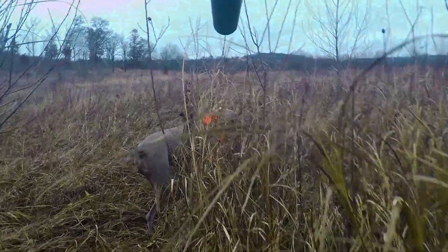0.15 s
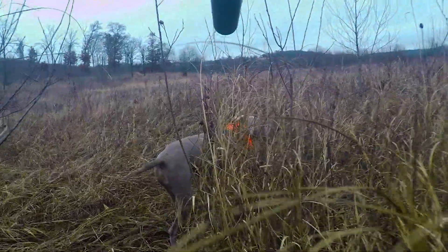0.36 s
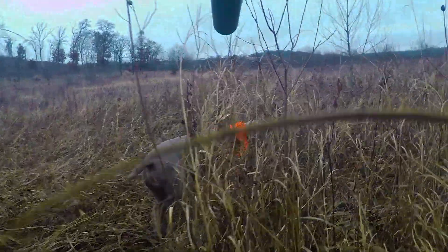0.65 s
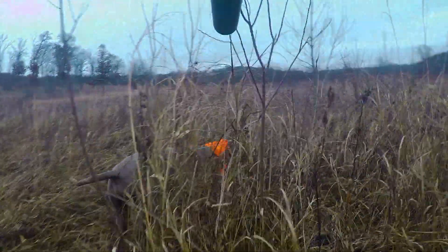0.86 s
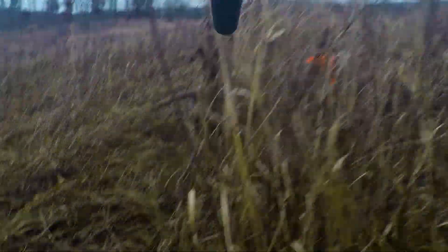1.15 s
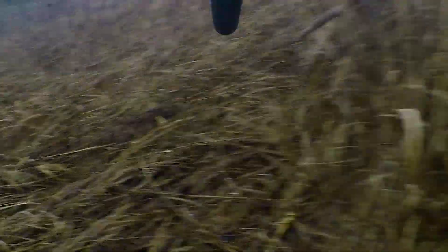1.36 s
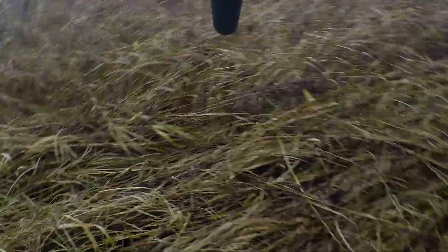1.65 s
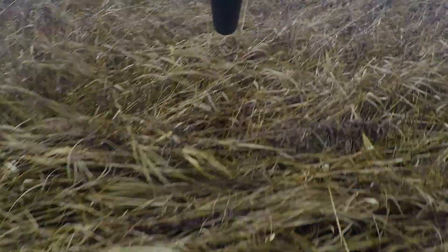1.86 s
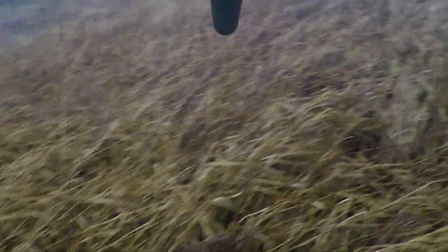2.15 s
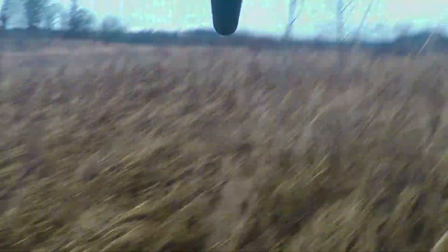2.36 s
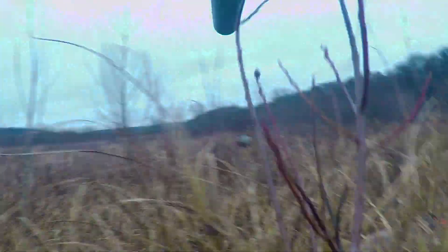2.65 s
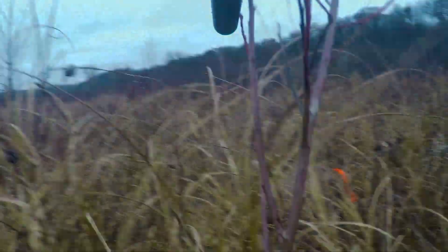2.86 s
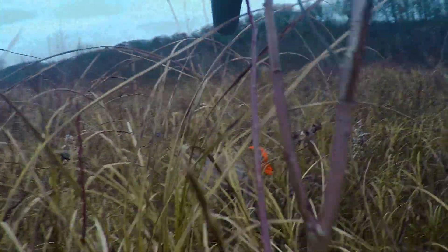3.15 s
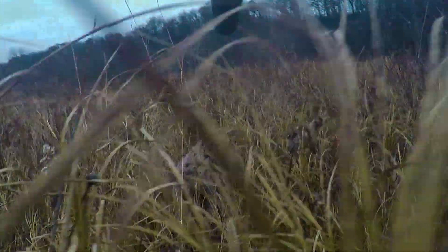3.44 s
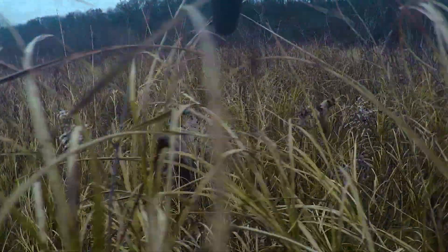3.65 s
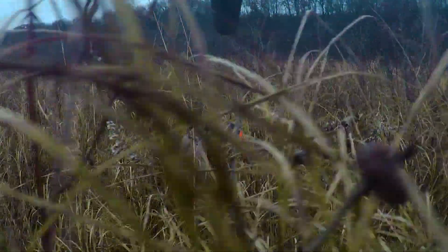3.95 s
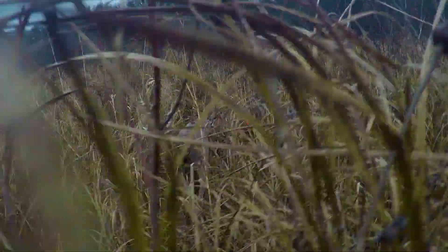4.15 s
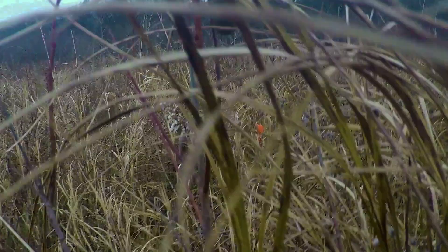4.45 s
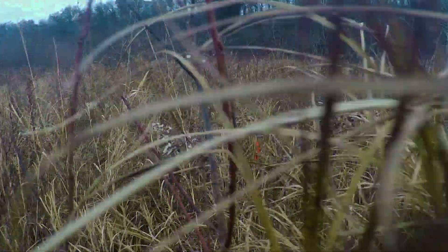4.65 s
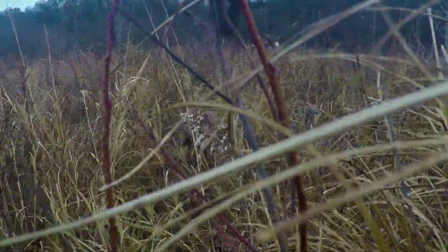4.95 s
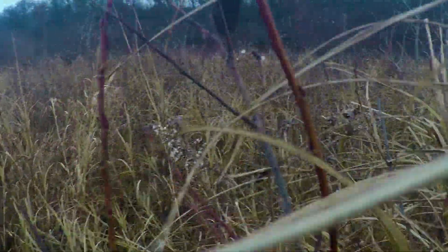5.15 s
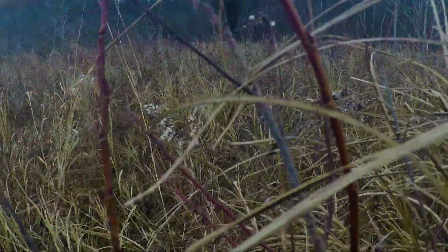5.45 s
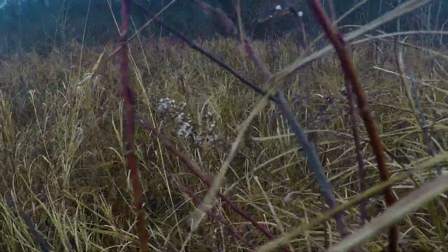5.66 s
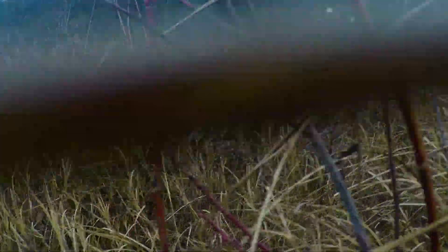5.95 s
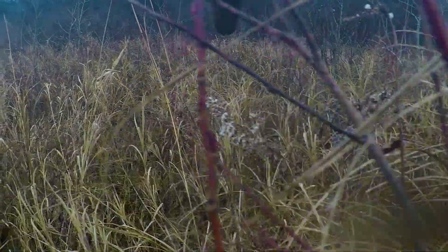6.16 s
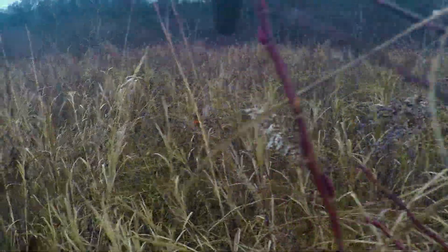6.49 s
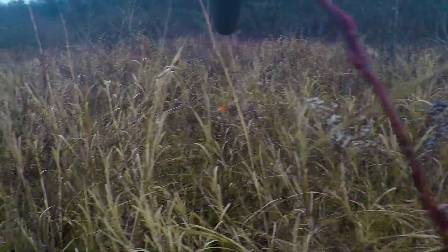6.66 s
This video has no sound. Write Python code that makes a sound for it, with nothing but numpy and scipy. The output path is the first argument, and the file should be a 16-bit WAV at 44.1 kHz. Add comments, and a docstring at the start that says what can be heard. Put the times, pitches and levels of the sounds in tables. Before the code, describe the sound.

Microphone inside a camera housing pushed through a dry field. A cluster of hard knocks and a strong low hum open it, fading to near quiet with soft leaf crackle and small ticks. A loud jolt hits at two seconds, then stems rasp repeatedly along the casing, with sharp knocks, one very hard near three and a half seconds. Blades swish across, then scraping continues to a final double knock.

```python
"""Pushing a camera through tall dry grass

A camera clamped under a barrel brushes past grass: noise shaped by resonances makes the rustle.
Uneven noise and trains of tiny catches make stems scrape along the housing and flat blades swish over it.
Twigs knock with short noise bursts, and jolts set the springy mount humming near 95 Hz with decaying sines.
The hardest knocks overload the microphone, which flattens their peaks."""
import sys
import numpy as np
from scipy import signal
from scipy.fft import rfft, irfft, next_fast_len
from scipy.io import wavfile
from scipy.ndimage import uniform_filter1d

SR = 44100
rng = np.random.default_rng(int(sys.argv[2]) if len(sys.argv) > 2 else 0)


def waveform_to_disk(signal):
    """Save audio, clipped to [-1, 1], as 16-bit WAV at the path in sys.argv[1]."""
    frames = np.transpose(np.atleast_2d(signal))
    scaled = np.clip(frames, -1, 1) * 32767
    samples = np.round(scaled).astype(np.int16)
    wavfile.write(sys.argv[1], SR, samples)


N = 300762  # length in samples

# resonances of the housing when something touches it: [pitch_hz, width_hz, level_db]
HOUSING_MODES = [(411.4, 230, -13), (635, 39, 1.5), (736.7, 150, 1), (880, 110, -37), (1257, 550, 2),
                 (1425, 260, 6.5), (1681, 590, 3.5), (2300, 410, 7), (2632, 287, 0.5), (2964, 290, -25.5),
                 (3450, 320, -16), (3984, 310, -10), (4497, 1200, -15), (5900, 310, -20.5),
                 (7020, 680, -22.5), (8460, 1400, -33), (10770, 1100, -35), (13500, 1600, -33.5)]
# ways the springy mount can vibrate: [pitch_hz, level_db, time_to_fall_60_db_s]
MOUNT_MODES = [(95.4, 0, 0.73), (168.4, -13.5, 0.15), (257, -43.5, 0.099), (376, -16.5, 0.082),
               (409, -22.5, 0.1), (543, -26, .09), (755, -39, .08)]
# how hard the walk shakes the mount, before each layer's own offset: [time_s, level_db]
SHAKE_LEVEL = [(0, -39), (.5, -56.5), (.8, -48), (1.0, -38), (1.25, -36), (1.58, -29), (1.82, -39),
               (2.08, -24), (2.27, -48.5), (2.52, -37), (2.86, -24.5), (3.05, -37.5), (3.65, -36),
               (3.85, -43), (3.98, -33), (5.0, -37.5), (5.5, -36.5), (6.82, -36)]
# stems that drag along the housing, levels before the trims in scrape():
# [start_s, length_s, level_db, sharp_edge_db, swell_from_start_to_end_db, stem_pitch_hz]
STEM_STROKES = [(0.803, 0.022, -39, 0.5, 5, 2000), (2.027, 0.04, -39.5, -8.5, -3, 1396),
                (2.436, 0.17, -56, -3.5, -2.5, 1420), (2.633, 0.014, -37.5, 1, -2.5, 2320),
                (2.679, 0.13, -35, 1.5, 3.5, 2300), (2.769, 0.18, -29.5, -11.5, 0, 2175),
                (2.96, 0.13, -35.5, -20, 6, 1450), (3.044, 0.13, -31.5, -3, 5, 2170),
                (3.196, .26, -26, -2.5, 5, 2170), (3.533, .19, -32.5, -2, 2.5, 2450),
                (3.923, 0.06, -36, -14, -6.5, 1900), (4.068, 0.23, -31, -5.5, 2, 1646),
                (4.356, 0.18, -30, -20, 2, 1540), (4.556, .37, -30, -3.5, 1.5, 2420),
                (4.952, 0.18, -27.5, -13.5, 1.5, 1518), (5.174, 0.056, -35, -11, 0, 1380),
                (5.268, .12, -32.5, -14.5, -1, 1290), (5.431, 0.076, -34.5, -14, -0.5, 2330),
                (5.541, 0.18, -32.5, -7.5, 2.5, 2217), (5.742, 0.19, -34.5, -14.5, -4, 1386),
                (5.954, 0.1, -41.5, -3.5, 1, 2640), (6.097, .22, -29, -14, 4.5, 1320),
                (6.327, 0.21, -24.5, -11, 8, 1400), (6.562, 0.19, -28, -5, 0.5, 1460),
                (6.685, 0.037, -26, 1.5, 5, 2660)]
# a stem bites, drags, then slips off
STEM_ATTACK_S, STEM_RELEASE_S = 0.023, 0.034
# where the body of a sound ends and its sharp edge begins, and where the edge gives way to snap or hiss
EDGE_HZ, SNAP_HZ = 3200, 8300


def undb(db):
    """Turn decibels into a gain."""
    return 10 ** (np.asarray(db) / 20)


def unit(x):
    """Scale a sound to an rms (average strength) of 1."""
    return x / np.sqrt(np.mean(x ** 2) + 1e-20)


def add(out, s, sound):
    """Mix a sound in, starting at s seconds."""
    i = max(0, int(s * SR))
    out[i:i + len(sound)] += sound[:max(0, N - i)]


def curve(points):
    """Join (s, dB) points by straight lines and turn them into levels in dB; silent outside their span."""
    return np.interp(np.arange(N) / SR, *np.transpose(points), left=-120, right=-120)


def walk(rate):
    """A smooth random wander with a spread of 1, heading for a new value rate times a second."""
    step = max(2, int(SR / rate))
    stairs = np.repeat(rng.standard_normal(N // step + 2), step)
    return unit(uniform_filter1d(stairs, step)[:N])


def bins(size):
    """Frequencies of a spectrum in Hz, kept above zero."""
    return np.maximum(np.fft.rfftfreq(size, 1 / SR), 1)


def colour(x, points):
    """Give a sound the tone colour of (Hz, dB) points."""
    hz, db = np.transpose(points)
    size = next_fast_len(len(x))
    gain = undb(np.interp(np.log(bins(size)), np.log(hz), db))
    return irfft(rfft(x, size) * gain, size)[:len(x)]


def ring(resonances, size=2048):
    """The short ringing answer to one tap of a body with steep resonances; it starts at once."""
    f = bins(size)
    power = sum(undb(db) ** 2 / (1 + ((f * f - hz * hz) / (f * width)) ** 2) ** 2
                for hz, width, db in resonances)
    # folding the cepstrum puts the energy as early as possible
    cepstrum = irfft(np.log(power + 1e-8))
    cepstrum[0] /= 2
    cepstrum[size // 2:] = 0
    return irfft(np.exp(rfft(cepstrum)))[:size // 2]


def cut(x, hz, kind):
    """A steep low, high or band pass."""
    return signal.sosfilt(signal.butter(5, hz, kind, fs=SR, output="sos"), x)


def patchy(x, spread_db, rate, count=16):
    """Neighbouring bands swell and fade on their own as contact points move, so the colour keeps shifting."""
    size = next_fast_len(N, True)
    spectrum = rfft(x, size)
    place = np.interp(np.log(bins(size)), np.log([700, 13000]), [0, count - 1])
    out = np.zeros(N)
    for k in range(count):
        band = irfft(spectrum * np.maximum(1 - abs(place - k), 0), size)[:N]
        out += band * undb(spread_db * walk(rate))
    return out


def strokes(table, attack_s, release_s):
    """Gains of the body and the treble of strokes that each rise, swell or ease, and let go."""
    body, treble = np.zeros(N), np.zeros(N)
    for s, length, db, treble_db, swell_db, *_ in table:
        t = np.arange(int((length + .2) * SR)) / SR
        # from 1.5 swells below the table's level to half a swell below it
        swell = undb(db + swell_db * (np.minimum(t / length, 1) - 1.5))
        attack = np.minimum(t / attack_s, 1)
        release = np.exp(-(np.maximum(t - length, 0) / release_s) ** 2)
        gain = swell * attack * release
        # strokes that overlap add up as energy
        add(body, s, gain ** 2)
        add(treble, s, (gain * undb(treble_db)) ** 2)
    return np.sqrt(body), np.sqrt(treble)


def friction(slip_rate, slip_db, catch_rate, catch_db):
    """Dense tiny slips as noise whose level wanders fast and slowly, as a stem catches and lets go."""
    return rng.standard_normal(N) * undb(slip_db * walk(slip_rate) + catch_db * walk(catch_rate))


def rasp(catch_hz, wander, uneven, size_db):
    """A ribbed stalk ticks over an edge: an uneven train of catches whose speed wanders around catch_hz."""
    speed = catch_hz * np.exp(wander * walk(14) + uneven * walk(600))
    turns = np.cumsum(speed) / SR
    at = np.flatnonzero(np.diff(np.floor(turns)))
    catches = np.zeros(N)
    catches[at] = undb(size_db * np.clip(rng.standard_normal(N)[:len(at)], -2, 2))
    return unit(catches)


def scrape(press, edge_gain, rasp_db=-2):
    """Stick and slip rings the housing and each stem; sharp edges bring out the upper resonances of both."""
    # ribs of a stem that sing when its edge is drawn over the housing: [pitch_hz, width_hz, level_db]
    rib_modes = [(4044, 260, 4.5), (4730, 300, -2.5), (5100, 220, -8), (6480, 350, -5), (7180, 370, -8.5)]
    # levels of the ribs (against the housing's upper resonances), of each stem's ring and of the housing
    sing_db, ring_db, housing_db = -7, -11, -1.5
    stem_q = 7.6  # sharpness of each stem's own ring
    force = unit(friction(slip_rate=1000, slip_db=0, catch_rate=130, catch_db=2.05))
    force = force + undb(rasp_db) * rasp(catch_hz=375.4, wander=.35, uneven=.4, size_db=2)
    shell = patchy(signal.fftconvolve(force, ring(HOUSING_MODES))[:N], spread_db=2.5, rate=45, count=10)
    sing = patchy(signal.fftconvolve(force, ring(rib_modes))[:N], spread_db=6.5, rate=14, count=20)
    body = unit(cut(shell, EDGE_HZ, "low"))
    edge = unit(cut(shell, EDGE_HZ, "high"))
    out = body * press * undb(housing_db)
    out += unit(edge + unit(sing) * undb(sing_db)) * edge_gain
    for stem in STEM_STROKES:
        gain, _ = strokes([stem], STEM_ATTACK_S, STEM_RELEASE_S)
        stem_ring = signal.lfilter(*signal.iirpeak(stem[-1], stem_q, SR), body)
        out += unit(stem_ring) * gain * undb(ring_db)
    return out


def swish(press, hiss_gain, catch_hz=330):
    """Blade after blade slides across, hissing and crackling in a colour that keeps shifting."""
    # colour of flat blades sliding over the housing: [pitch_hz, level_db]
    blade_colour = [(300, -20), (900, -10), (1400, 1), (1800, 1.5), (2100, 0.5), (2600, 9.5), (3100, 4),
                    (3700, 4.5), (4700, -2), (5500, -6), (7200, -9), (9700, -25), (13300, -22),
                    (16000, -35)]
    slide = unit(friction(slip_rate=1300, slip_db=1.0, catch_rate=110, catch_db=1.2))
    crackle = rasp(catch_hz, wander=.5, uneven=.8, size_db=4.5)
    # blades with the most hiss for their pressure also crackle most
    grip = np.clip(2 * hiss_gain / (press + 1e-9), 0, .8)
    mix = slide * np.sqrt(1 - grip ** 2) + crackle * grip
    blades = patchy(colour(mix, blade_colour), spread_db=4.0, rate=65, count=14)
    # the body is levelled by its middle band
    body = cut(blades, SNAP_HZ, "low") / np.std(cut(blades, [EDGE_HZ, SNAP_HZ], "band"))
    hiss = unit(cut(blades, SNAP_HZ, "high"))
    return body * press + hiss * hiss_gain


def wisps():
    """A serrated blade edge zips past: a very high, brief puff of noise."""
    # thin wisps of hiss from single blade edges: [start_s, length_ms, level_db]
    wisp_rows = [(4.904, 19, -51.5), (5.64, 12, -51.5), (5.712, 19, -42.5)]
    out = np.zeros(N)
    for s, ms, db in wisp_rows:
        size = int(ms * SR / 1000)
        hiss = cut(rng.standard_normal(size), [10500, 14200], "band")
        add(out, s, unit(hiss * signal.windows.tukey(size)) * undb(db))
    return out


def knocks(blows, strike=2.63, press_s=.0005, chatter_db=-22, chatter_s=0.011, ping_growth=0.97):
    """A short crunch of contact rings the twig and the housing; the twig chatters on and the barrel pings."""
    # lasting modes of the barrel, set ringing by hard knocks: [pitch_hz, level_db, time_to_fall_60_db_s]
    barrel_modes = [(265, -22.5, 0.229), (643, -34, 0.2), (920, -24, 0.06), (1573, -36.5, 0.17),
                    (2040, -32.5, .1), (2555, -40, .14)]
    # the harder a blow, the shorter its contact: decay time at 0 dB, and dB down that doubles it
    contact_s, contact_doubling_db = 0.0014, 22
    twig_gain, twig_q = 2.5, 3.5  # strength and sharpness of the twig's own ring
    out, shell = np.zeros(N), ring(HOUSING_MODES)
    t, tail = np.arange(SR // 20) / SR, np.arange(SR // 2) / SR
    window = SR // 100
    bands = [(EDGE_HZ, "low"), ([EDGE_HZ, SNAP_HZ], "band"), (SNAP_HZ, "high")]
    ping = sum(undb(db) * np.sin(2 * np.pi * hz * tail) * np.exp(-np.log(1000) * tail / t60)
               for hz, db, t60 in barrel_modes)
    for s, db, edge_db, snap_db, twig_hz in blows:
        contact = np.exp(-t / (contact_s * 2 ** (-db / contact_doubling_db)))
        chatter = undb(chatter_db) * np.exp(-t / chatter_s)
        force = rng.standard_normal(len(t)) * (contact + chatter) * (1 - np.exp(-t / press_s))
        force[int(press_s * SR)] += strike
        force = force + twig_gain * signal.lfilter(*signal.iirpeak(twig_hz, twig_q, SR), force)
        hit = signal.fftconvolve(force, shell)[:len(t)]
        hit = sum(unit(cut(hit, *band)) * undb(d) for band, d in zip(bands, (0, edge_db, snap_db)))
        # the level of a knock is its energy spread over a hundredth of a second
        add(out, s, hit * np.sqrt(window / len(t)) * undb(db))
        # only heavy blows move the barrel much
        add(out, s, ping * undb(ping_growth * db))
    return out


def ticks(press):
    """Chance flicks of small twigs, as loud as the brushing allows, given as rows like those of the knocks."""
    ticks_per_s, tick_db, scatter_db = 14, -6, 2  # rate, level against the brushing, level scatter
    edge_db, snap_db = -7.5, -19
    twig_hz, scatter_octaves = 2100, 0.58
    chance = rng.random((200, 4))
    # random waits, starting from the first stem
    times = np.cumsum(-np.log(1 - chance[:, 0])) / ticks_per_s + STEM_STROKES[0][0]
    rows = []
    for s, (size, edge, pitch) in zip(times, 2 * chance[:, 1:] - 1):
        if s < N / SR:
            brushing_db = 20 * np.log10(press[int(s * SR)] + 1e-6)
            rows.append((s, brushing_db + tick_db + scatter_db * size, edge_db + scatter_db * edge,
                         snap_db, twig_hz * 2 ** (scatter_octaves * pitch)))
    return rows


def jolts(glide=0.016, glide_s=0.076, thump_hz=52, thump_s=0.021, thump_db=-11):
    """The mount swings up and rings down, a little sharp at first; sudden jolts stress upper modes and a thump."""
    # jolts of the mount: [start_s, level_db, rise_ms, settled_pitch_hz]
    jolt_rows = [(0, -3, 34, 93.26), (1.068, -20, 26, 89.6), (1.133, -21, 39, 93.5), (1.512, -17, 53, 99.1),
                 (2.103, -2, 0.94, 94.2), (2.865, -6, 32, 96.6), (2.995, -15.5, 30, 94.7),
                 (3.412, -11.5, 2.1, 87.9), (3.935, -23, 1.3, 93.6), (4.18, -22, 33, 94.1),
                 (4.421, -24.5, 52, 97.1), (4.738, -23, 33, 95.1), (4.91, -23, 29, 92.2),
                 (5.589, -28, 17.7, 100), (6.768, -23.5, 35, 92)]
    # ring time; upper modes after a 1 ms rise, and their loss for each tenfold slower rise
    jolt_t60_s, upper_at_1ms_db, softening_db = 0.38, 7, 14.5
    out, t = np.zeros(N), np.arange(SR) / SR
    turns = 2 * np.pi * (t + glide * glide_s * (1 - np.exp(-t / glide_s)))
    thump = np.sin(2 * np.pi * thump_hz * t) * np.exp(-t / thump_s)
    for s, db, rise_ms, hz in jolt_rows:
        rise = rise_ms / 1000
        upper_db = upper_at_1ms_db - softening_db * np.log10(rise_ms)
        # each jolt brings its own lowest mode
        modes = [(hz, 0, jolt_t60_s)] + [(f, d + upper_db, life) for f, d, life in MOUNT_MODES[1:]]
        since_peak = np.maximum(t - rise, 0)
        swing = sum(undb(d) * np.sin(f * turns) * np.exp(-np.log(1000) * since_peak / life)
                    for f, d, life in modes)
        attack = np.minimum((t + 1 / SR) / rise, 1)
        add(out, s, (swing + thump * undb(thump_db + upper_db)) * attack * undb(db))
    return out


def sway(hum_db=-0.5, upper_db=-12, waver_db=3):
    """Small random tugs, made of noise, keep the modes of the mount humming."""
    tugs = rng.standard_normal(N)
    modes = [signal.lfilter([1], [1, -np.exp((2j * np.pi * hz - np.log(1000) / t60) / SR)], tugs)
             for hz, db, t60 in MOUNT_MODES]
    # the lowest mode is evened out and given a set waver; the upper ones flutter freely
    lowest = modes[0]
    even = lowest.real / (abs(lowest) + np.std(lowest) / 2)
    hum = unit(even) * undb(waver_db * walk(24))
    upper = sum(unit(z.real) * undb(db + upper_db) for z, (hz, db, t60) in zip(modes[1:], MOUNT_MODES[1:]))
    return (unit(cut(hum, 101.4, "low")) + upper) * undb(curve(SHAKE_LEVEL) + hum_db)


def groans():
    """A stalk presses on the mount and makes it creak: noise ringing briefly on one low resonance."""
    # creaks: [start_s, length_s, pitch_hz, width_hz, level_db]
    groan_rows = [(1.268, 0.1025, 426, 130, -36), (5.963, 0.15, 758, 130, -46)]
    out = np.zeros(N)
    for s, length_s, hz, width_hz, db in groan_rows:
        size = int(length_s * SR)
        tone = signal.fftconvolve(rng.standard_normal(SR), ring([(hz, width_hz, 0)]), "valid")[:size]
        add(out, s, unit(tone * np.hanning(size)) * undb(db))
    return out


def handling(press, rub_db=-8, rub_growth=1.288, drag_db=-16, rumble_db=-2.5, braced_db=-6):
    """Dull rubbing grows with shaking and stem drag; a soft rumble follows the shaking, less when stems brace it."""
    # colour of the dull rubbing that travels up the mount: [pitch_hz, level_db]
    dull_colour = [(110, -32), (200, -15), (265, 0), (310, -8), (400, 9), (460, 4), (560, 2.5), (750, -7.5),
                   (920, -17), (1400, -31.5), (4000, -60.5)]
    # colour of the handling rumble: [pitch_hz, level_db]
    rumble_colour = [(8, -4.5), (25, 4), (55, -10.5), (80, -10.5), (130, -13.5), (250, -25.5), (900, -76)]
    rub = unit(colour(friction(slip_rate=240, slip_db=2.0, catch_rate=72, catch_db=2.9), dull_colour))
    rumble = unit(colour(rng.standard_normal(N), rumble_colour))
    shake_db = curve(SHAKE_LEVEL)
    rub_gain = np.hypot(undb(rub_db + rub_growth * shake_db), press * undb(drag_db))
    rumble_gain = undb(shake_db + rumble_db + braced_db * np.tanh(unit(press)))
    return rub * rub_gain + rumble * rumble_gain


def rustle(gain_db=3):
    """Countless dry leaves crackle softly a little way off: flickering noise through airborne resonances."""
    # resonances that colour the sound coming through the air: [pitch_hz, width_hz, level_db]
    air_modes = [(1055, 160, -3), (1400, 660, -1), (2460, 460, 0.5), (2960, 760, 0), (3650, 600, -4.5),
                 (4670, 1600, -8.5), (6230, 930, -5.5), (7460, 900, -13), (8150, 1800, -15),
                 (10900, 5900, -13.5), (13700, 2600, -16)]
    # grass all around, until the brush closes in, before gain_db is added: [time_s, level_db]
    grass_level = [(0.0, -71), (0.47, -70.5), (0.69, -60), (0.94, -54), (1.19, -56), (1.34, -48),
                   (1.46, -43.5), (1.51, -46.5), (1.76, -48.5), (1.97, -41), (2.1, -54), (2.45, -52.5),
                   (2.67, -57.5), (2.7, -69)]
    # faint rustle of the thick brush further on: [time_s, level_db]
    brush_level = [(2.7, -56.5), (6.82, -58)]
    slips = friction(slip_rate=4700, slip_db=3.5, catch_rate=53, catch_db=0.5)
    leaves = signal.fftconvolve(slips, ring(air_modes))[:N]
    return unit(leaves) * (undb(curve(grass_level) + gain_db) + undb(curve(brush_level)))


def scene():
    """Everything reaches one microphone inside the housing."""
    # flat blades that slide over the housing: [start_s, length_s, level_db, fine_hiss_db,
    # swell_from_start_to_end_db]
    blade_strokes = [(3.59, 0.17, -38, -6, 3), (3.78, 0.12, -30, -10, 6), (3.935, 0.063, -36, -2.5, -3),
                     (4.022, 0.031, -29.5, -6.5, -2.5), (4.1, 0.11, -36.5, -5.5, -0.5),
                     (4.19, 0.243, -30, -3.5, 2.5), (4.45, 0.1, -35.5, -10, 2.5),
                     (4.57, 0.29, -30.5, -12.5, 1.5), (5.98, 0.039, -46.5, -12, 6),
                     (6.22, 0.1, -50.5, -12, -3.5)]
    # twigs and stalks hitting the housing: [start_s, level_db, sharp_edge_db, snap_db, twig_pitch_hz]
    knock_rows = [(0.013, -19, -12, -27, 2127), (0.021, -23, -2, -27, 2600), (0.033, -13, 1.5, -27, 1670),
                  (0.0679, -21.5, -10.5, -38, 1650), (0.764, -45.5, -2, -7, 2190),
                  (0.801, -31, -4, -13.5, 1930), (0.988, -41, -26.5, -24, 1350),
                  (1.067, -25.5, -5.5, -10, 2900), (1.296, -29.5, -17, -47, 1270),
                  (1.5125, -26.5, 8, 0, 2890), (1.526, -37.5, 0, 0, 3920), (1.587, -22, 1.5, -15, 5170),
                  (1.773, -35, -9, -10, 2790), (1.874, -31.5, 0, -13, 5300),
                  (1.962, -35.5, -25, -1.5, 3000), (2.097, -8.5, -4.5, -33, 2000),
                  (2.6361, -14.5, -5, -47.5, 2250), (2.8357, -12, -18, -34, 1360),
                  (2.867, -26, -8.5, -37, 1245), (2.896, -21, -16, -47.5, 2286), (3.408, -26, -1, -8, 1600),
                  (3.4884, -18, -29.5, -38, 2300), (3.4936, -2, -18.5, -31, 2550),
                  (3.657, -18, -12, -22, 2440), (3.7237, -14.5, -2.5, -26, 2340),
                  (3.7558, -28, -1.5, -29, 2360), (3.936, -24.5, -2.5, -15.5, 2430),
                  (3.947, -25, -6, -9, 2390), (4.044, -23.5, -22, -9, 1110), (4.086, -35.5, -23, -34, 1300),
                  (4.099, -24.5, -21, -24.5, 890), (4.162, -26.5, 0, -18.5, 4300),
                  (4.405, -24, -26, -18, 2530), (4.888, -20, -25, -31, 1430), (6.2635, -24, -16, -32, 1640),
                  (6.574, -27, -0.5, -27, 2490), (6.7487, -17, -1, -17, 2480),
                  (6.76, -10.5, -0.5, -19.5, 2430)]
    stem, edge = strokes(STEM_STROKES, STEM_ATTACK_S, STEM_RELEASE_S)
    # a blade catches and lets go faster than a stem
    blade, hiss = strokes(blade_strokes, attack_s=0.0058, release_s=.02)
    grass = rustle() + scrape(stem, edge) + swish(blade, hiss) + wisps()
    mount = jolts() + sway() + groans() + handling(stem)
    twigs = knocks(knock_rows) + knocks(ticks(np.hypot(stem, blade)))
    return (grass + mount + twigs)[None]


def record(dry):
    """The camera flattens the hardest peaks and cuts the top above 15250 Hz."""
    held = dry / (1 + (dry / 1.05) ** 8) ** (1 / 8)
    return signal.sosfilt(signal.ellip(10, .2, 80, 15250, fs=SR, output="sos"), held)


dry = scene()
out = record(dry)
waveform_to_disk(out)
```